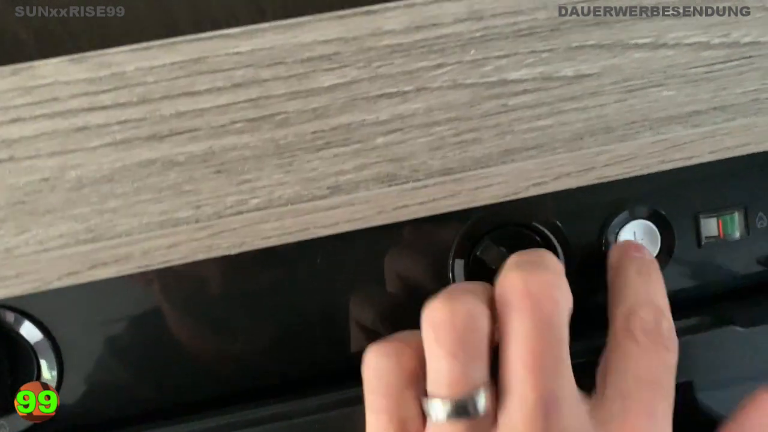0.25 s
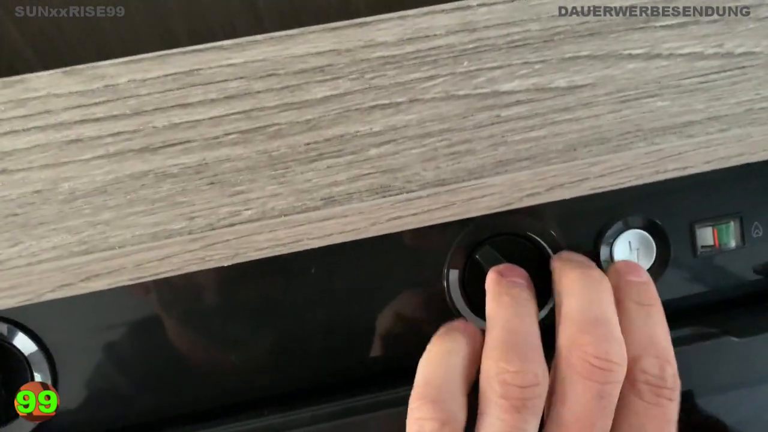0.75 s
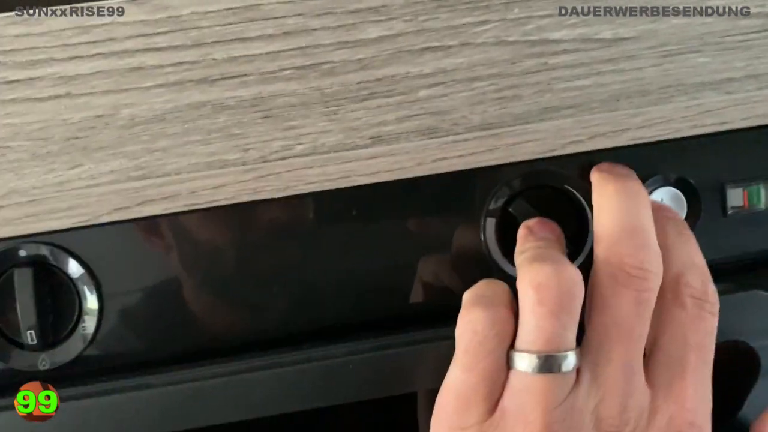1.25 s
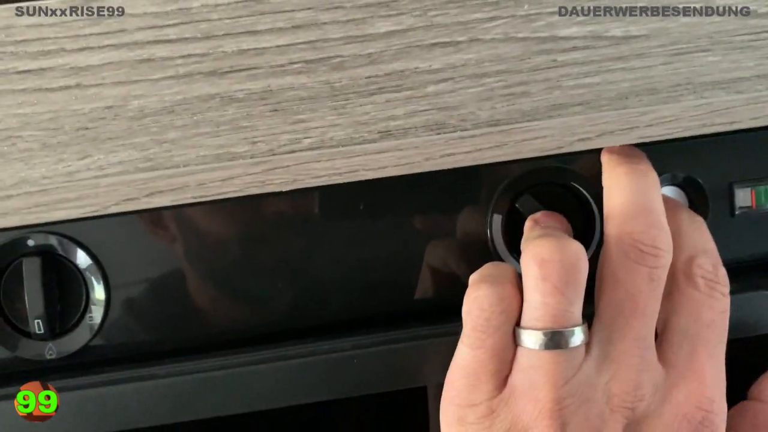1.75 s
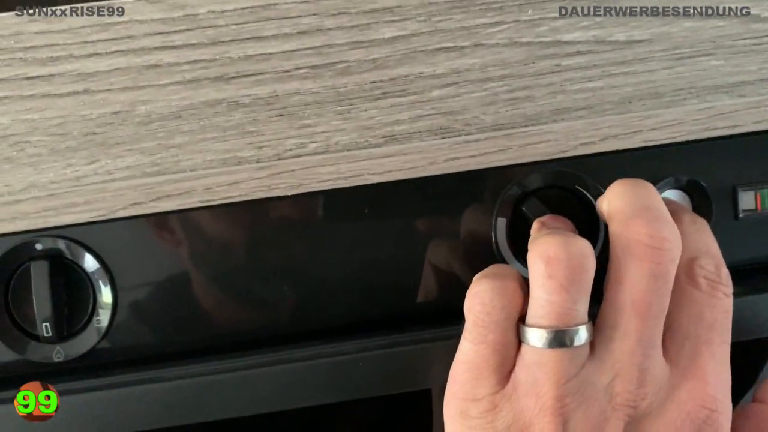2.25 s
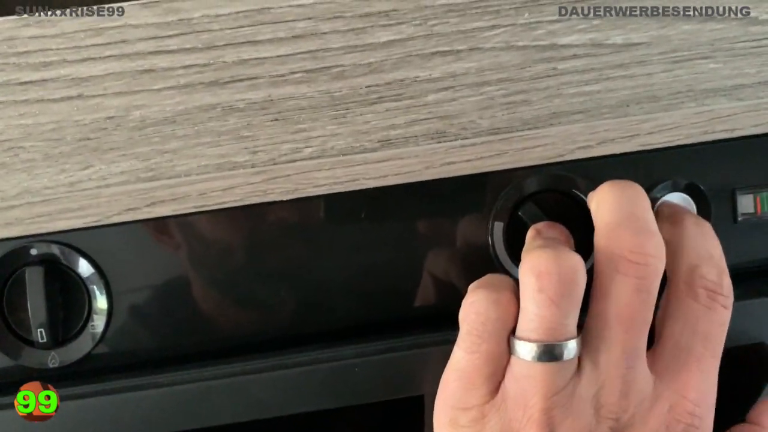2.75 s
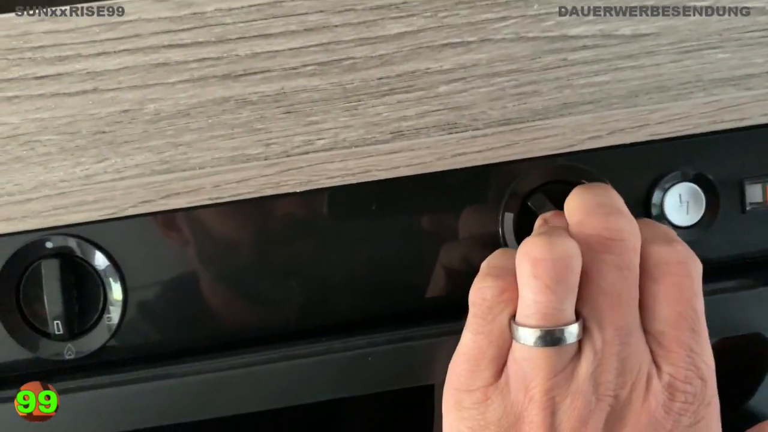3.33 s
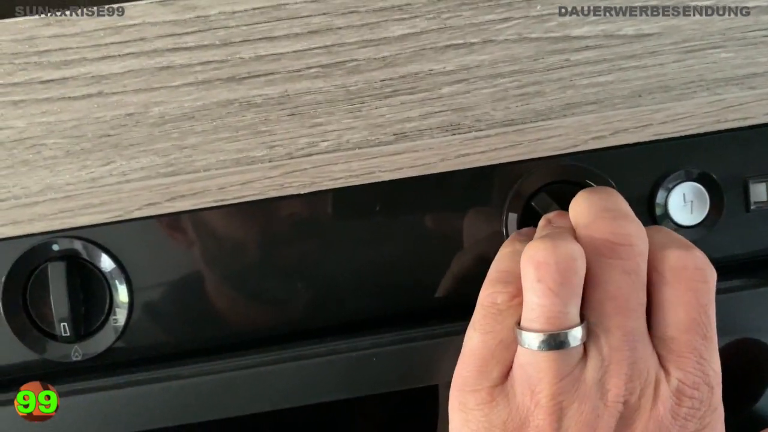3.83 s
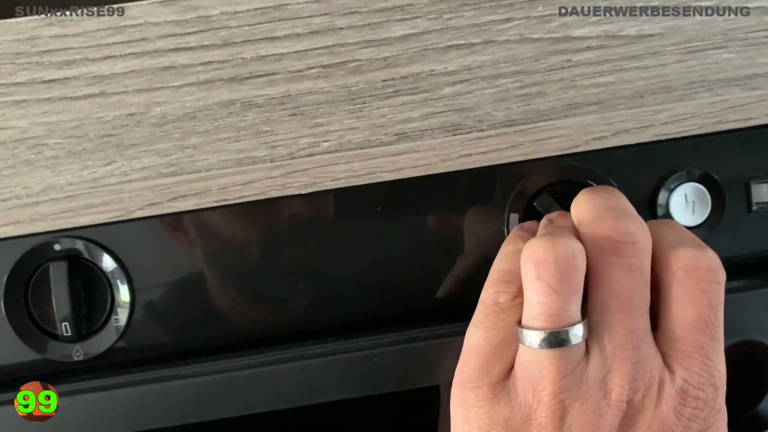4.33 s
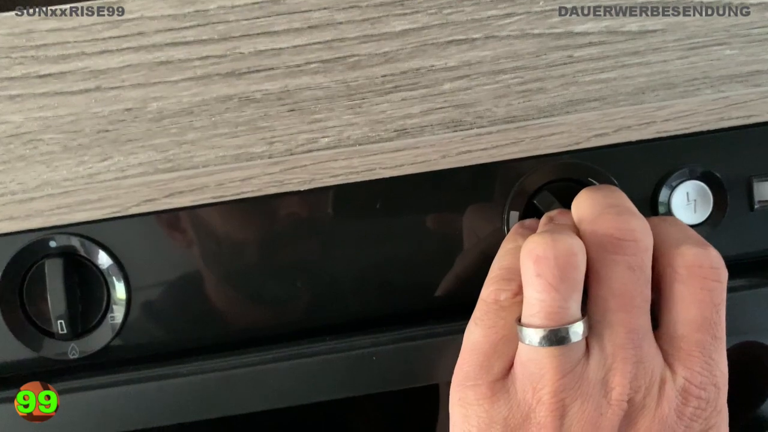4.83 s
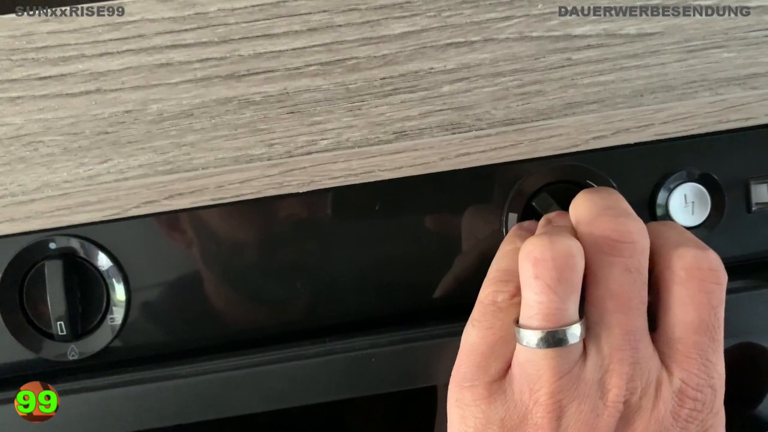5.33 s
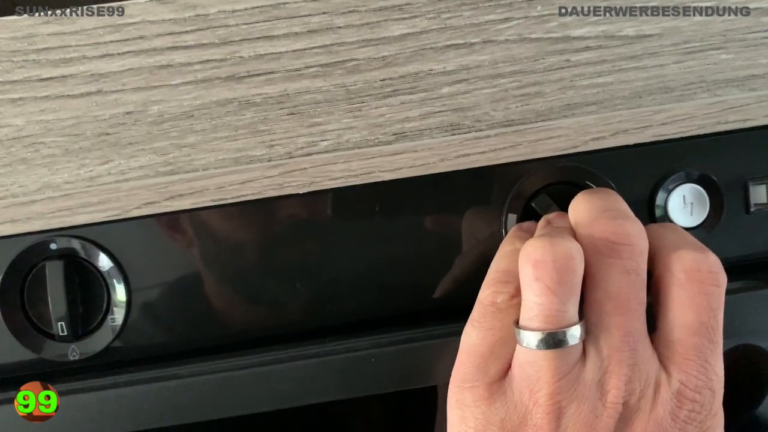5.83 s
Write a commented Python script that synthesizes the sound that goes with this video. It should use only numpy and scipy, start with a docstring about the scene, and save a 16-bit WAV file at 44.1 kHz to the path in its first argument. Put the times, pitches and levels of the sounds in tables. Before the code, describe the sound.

Sharp plastic clicks and low cabinet thuds as a button and knob are worked, with brief finger rubbing over a soft low rumble.

```python
"""Igniter and gas knob of a camper fridge

A hand presses the igniter button and gas knob on the control strip, a phone held close above. Clicks are
decaying plastic modes with bursts of treble noise; thuds are low decaying swings of the cabinet. Fingers rub as
grainy filtered noise; squeaks and short rings sound as wavering tones; low filtered noise rumbles in the small
cabin. Two microphone ports hear these with the left leading; echoes, part of the rubbing and port hiss differ
in each."""
import sys
import numpy as np
from scipy import signal
from scipy.fft import rfft, irfft, next_fast_len
from scipy.io import wavfile
from scipy.ndimage import uniform_filter1d

SR = 44100
rng = np.random.default_rng(int(sys.argv[2]) if len(sys.argv) > 2 else 0)


def to_wav(s):
    """Save 16-bit WAV."""
    ch = np.atleast_2d(s).T  # columns
    pcm = np.round(np.clip(ch, -1, 1) * 32767)  # PCM
    wavfile.write(sys.argv[1], SR, pcm.astype(np.int16))


N = 268039  # length in samples

# Modes of the plastic strip: (frequency [Hz], relative level [dB], t60 [s])
STRIP_MODES = [(1098, 11, 0.025), (1196, -3, 0.061), (1416, -3.5, 0.0287), (1538, 1, 0.021),
               (1764, 7.5, 0.016), (1983, 3, 0.054)]
# Modes of the low knock: (frequency [Hz], relative level [dB], t60 [s])
KNOCK_MODES = [(552, -3, 0.098), (596, -7, 0.19), (754.6, 0.5, 0.055), (861.6, -4, 0.098), (984, 1, 0.027)]
# Modes of the knob: (frequency [Hz], relative level [dB], t60 [s])
KNOB_MODES = [(3071, 2, 0.012), (3430, -10, 0.02)]
# Upper modes, peaks of the treble noise: (frequency [Hz], relative level [dB], t60 [s])
UPPER_MODES = [(4387, 6, 0.11), (4690, -1, 0.032), (6836, 4, 0.018)]
# Spectrum of rubbing and rattle: (frequency [Hz], relative level [dB])
FINGER_COLOUR = [(250, 13.5), (560, -3.5), (900, -3), (1200, -4), (1550, 0), (1900, -10), (2400, -28)]
# Spectrum of treble rubbing and chatter: (frequency [Hz], relative level [dB])
FINGER_TREBLE = [(2000, 0), (3200, -7.5), (4600, -11.5), (5700, -11.5), (7200, -16), (13000, -24.5)]
GRAIN_DB, PATCHY_DB = 4.5, 4  # spread of sample levels, flicker of each third-octave


def undb(db):
    """Logarithmic level: 20 dB is a factor of ten in amplitude."""
    return 10 ** (np.asarray(db) / 20)


def curve(table):
    """Linear interpolation of a (time, level) table, one value per sample."""
    times, levels = np.transpose(table)
    return np.interp(np.arange(N) / SR, times, levels)


def walk(rate):
    """Random modulation: levels drawn at rate [Hz], spread near 1, joined by a moving average."""
    hold = int(SR / rate)
    levels = rng.standard_normal(N // hold + 1)
    return uniform_filter1d(np.repeat(levels, hold), hold)[:N]


def noise(colour, grain_db=0, patchy_db=0, modes=()):
    """Spectral shaping of random pushes to rms 1, with optional grain, band flicker and resonance peaks."""
    resonance_db, resonance_width_hz = 9, 45
    hz, db = np.transpose(colour)
    size = next_fast_len(N)
    f = np.arange(size // 2 + 1) * SR / size + 1  # 1 Hz up, so that the logarithm is finite
    # a few samples much stronger than the rest make tiny clicks
    grain = undb(grain_db * np.minimum(rng.exponential(size=size), 6))
    spectrum = rfft(rng.standard_normal(size) * grain)
    spectrum = spectrum * undb(np.interp(np.log(f), np.log(hz), db, -90, -90))
    peaks = 1
    for mode in modes:
        peaks = peaks + undb(resonance_db) / (1 + (2 * (f - mode[0]) / resonance_width_hz) ** 2)
    spectrum = spectrum * peaks
    if patchy_db:
        x = np.zeros(N)
        # overlapping triangular third-octave bands, each with its own random level
        for k in np.arange(np.floor(3 * np.log2(hz[0])), 3 * np.log2(hz[-1]) + 1):
            weight = np.clip(1 - np.abs(3 * np.log2(f) - k), 0, 1)
            band = irfft(spectrum * weight, size)[:N]
            x = x + undb(patchy_db * walk(90)) * band
    else:
        x = irfft(spectrum, size)[:N]
    return x / x.std()


def add(out, s, sound):
    """Superposition: add a sound from time s [s]."""
    i = int(s * SR)
    out[i:i + len(sound)] += sound[:max(N - i, 0)]


def ring(modes, t, scatter_db, detune, rise_s, favour_hz=0):
    """Modal sum: a blow of finite contact time excites decaying sines a little differently; peak 1."""
    hz, db, t60 = (column[:, None] for column in np.transpose(modes))
    level_scatter, pitch_scatter = rng.standard_normal((2, len(modes), 1))
    if favour_hz:
        db = db - 60 * np.abs(np.log2(hz / favour_hz))  # dB lost per octave from the favoured pitch
    gain = undb(db + scatter_db * level_scatter - 60 * t / t60)
    x = np.sum(gain * np.sin(2 * np.pi * hz * (1 + detune * pitch_scatter) * t), axis=0)
    x = x * (1 - np.exp(-(t / rise_s) ** 2))
    return x / np.abs(x).max()


def ports(x, lead, pan):
    """Interaural-style phase and level: right lags by lead(Hz) radians and is pan(Hz) dB weaker."""
    size = next_fast_len(N + 64)
    hz = np.arange(size // 2 + 1) * SR / size
    both = rfft(x, size)
    left = both * undb(pan(hz) / 2)
    right = both * undb(-pan(hz) / 2) * np.exp(-1j * lead(hz))
    return irfft([left, right], size)[:, :N]


def rumble():
    """Band-limited noise: the cabinet's boom throbs unevenly; the rest of the cabin noise wavers slightly."""
    # Boom over time: (time [s], mean level [dB])
    boom_levels = [(0.0, -33.5), (0.27, -45.5), (1.08, -44.5), (1.47, -25), (1.56, -26.5), (1.78, -38),
                   (3.84, -34.5), (4.15, -31), (4.55, -38), (6.08, -41)]
    # Spectrum of the boom: (frequency [Hz], relative level [dB])
    boom_colour = [(60, -30), (90, -13), (120, -1.5), (145, 1), (175, 1), (200, -4.5), (240, -24.5),
                   (400, -30)]
    # Spectrum of the cabin noise: (frequency [Hz], relative level [dB])
    cabin_colour = [(25, -27), (40, -5.5), (60, 3), (90, 1.5), (200, -18.5), (260, -44), (400, -22.5),
                    (800, -32), (1500, -51)]
    boom = undb(curve(boom_levels) + 1.8 * walk(24)) * noise(boom_colour)
    cabin_db = -41.5
    return boom + undb(cabin_db + 0.95 * walk(11.0)) * noise(cabin_colour)


def strokes():
    """Amplitude envelopes of friction, body and treble: each stroke swells and fades over its length."""
    # Strokes of skin over the strip: (start [s], length [s], peak level [dB], treble relative to it [dB])
    stroke_events = [(-.05, 0.33, -38, -10.5), (0.109, 0.28, -56.5, -4.5), (0.311, 0.5, -49.5, -18),
                     (0.71, 0.26, -51.5, -2.5), (0.958, 0.097, -53, -2.5), (1.24, 0.15, -36.5, -11),
                     (1.327, 0.23, -41, -13.5), (2.676, 0.22, -37, -11.5), (2.871, 0.17, -48.5, -20.5),
                     (3.768, 0.035, -53, -16), (3.574, 0.036, -50, -17), (3.91, 0.12, -48, -33.5),
                     (4.086, 0.24, -63.5, -21), (5.958, 0.15, -38, -12.5)]
    # Fingers resting on the controls: (time [s], level [dB])
    rest_levels = [(0, -63), (1.1, -58.5), (1.65, -50), (1.85, -61), (2.6, -62.5), (3.2, -58), (4.5, -61),
                   (5.0, -70.5), (6.08, -73)]
    t = np.arange(N) / SR
    body = undb(curve(rest_levels))
    treble = body * undb(-19.5)
    for s, length, db, treble_db in stroke_events:
        # a lean under 1 peaks early; the higher power swells the treble more narrowly
        lean, body_power, treble_power = 0.96, 1.77, 1.93
        swell = np.abs(np.sin(np.pi * np.clip((t - s) / length, 0, 1) ** lean))
        body = body + undb(db) * swell ** body_power
        treble = treble + undb(db + treble_db) * swell ** treble_power
    return body, treble


def fingers():
    """Friction: dragging skin makes grainy noise in the plastic's resonances, and rough wavering squeaks and
    short rings."""
    # Squeaks of skin and plastic, and short rings of the strip and knob: (time [s], length [s], mean pitch
    # [Hz], level [dB])
    squeak_and_ring_events = [(0.46, 0.07, 3600, -65), (1.294, 0.012, 1288, -39), (1.302, 0.02, 1254, -31),
                              (1.335, 0.022, 1250, -33), (1.537, 0.038, 1188, -40.5), (1.605, 0.022, 1563, -33.5),
                              (1.675, 0.066, 588, -34.5), (2.737, 0.024, 4380, -51)]
    body, treble = strokes()
    grain = undb(2 * walk(200) + 1.8 * walk(30))
    body_noise = noise(FINGER_COLOUR, GRAIN_DB, PATCHY_DB, STRIP_MODES + KNOCK_MODES)
    treble_noise = noise(FINGER_TREBLE, GRAIN_DB, PATCHY_DB, KNOB_MODES + UPPER_MODES)
    rub = grain * (body * body_noise + treble * treble_noise)
    for s, length, hz, db in squeak_and_ring_events:
        t = np.arange(int(length * SR)) / SR
        waver = 1 + .014 * walk(200)[:len(t)]
        rough = undb(3.5 * walk(200)[:len(t)])
        swell = np.sin(np.pi * (t / length) ** .6) ** .5
        tone = np.sin(2 * np.pi * np.cumsum(hz * waver) / SR)
        add(rub, s, undb(db) * rough * swell * tone)
    # further rubbing, independent at each port
    rub_apart = undb(-4) * body * np.array([noise(FINGER_COLOUR), noise(FINGER_COLOUR)])
    return rub, rub_apart


def clicks():
    """Impact: snaps excite plastic modes, treble crack, chatter and rattle; panels echo them to each port."""
    # Clicks: (time [s], strip level [dB], then relative to the strip: low knock [dB], knob [dB],
    # upper chatter [dB]; pitch that the blow favours [Hz])
    click_events = [(0.0202, -12, -3, -17, -22, 1340), (0.026, -32, 12, -26, -27.5, 1050),
                    (0.0405, -24.5, -21, -30, -30, 1200), (0.0858, -2, -22.5, -21.5, -45, 1440),
                    (0.1272, -13.5, 2, -16, -14, 1780), (0.137, -21, -0.5, -22, -11, 1500),
                    (0.791, -21.5, -8, -33, -39, 1530), (0.819, -25.5, -47, 6, -17.5, 1520),
                    (0.886, -24, -27, -8.5, -13.5, 1490), (1.2275, -40, -10.5, -12, -12.5, 1520),
                    (1.2533, -29, -13, -25, -32.5, 1290), (1.409, -31.5, -17, -47, -18.5, 1420),
                    (1.4333, -25, -16, -41, -23, 1500), (1.4633, -24.5, -17, -29, -14, 1540),
                    (1.6066, -27.5, -4.5, -20, -25, 1550), (1.736, -51.5, 16.5, -9, -2.5, 1090),
                    (2.7302, -16, -8.5, -25, -20.5, 1390), (2.78, -14.5, -4, -14, -25.5, 1400),
                    (2.803, -28.5, 0, -2, -12.5, 1500), (2.8306, -12.5, -52, -15.5, -23, 1520),
                    (3.051, -49, -5, -5, -19, 1560), (3.0967, -32.5, -7, -16, -17.5, 1540),
                    (3.3155, -31, -13, -20, -19.5, 1020), (3.509, -29.5, -2, -23, -24, 1040),
                    (3.8653, -42.5, 5.5, -9, -7, 1620), (4.189, -42, 10.5, -5, -16.5, 1040),
                    (4.2748, -35, 4.5, -24, -9.5, 1610), (4.344, -29.5, -25, -10, -11, 1800),
                    (4.349, -24.5, -44, -18, -33, 1550), (4.36, -38, -35, -9, -30, 1560),
                    (4.447, -37, -10, 0, -3.5, 1970), (4.4595, -32, -9, -11, -26.5, 1600),
                    (4.757, -24, -7, -12, -11.5, 1390), (5.985, -35, -18.5, -26, -12.5, 1590),
                    (6.0051, -16, -17, -32, -17.5, 1430), (6.0593, -13, -29.5, -21, -40.5, 1410)]
    # Thin treble ticks: (time [s], level [dB], t60 [s])
    tick_events = [(0.7906, -25.5, 0.022), (0.812, -36, 0.012), (0.818, -28.5, 0.018), (0.888, -41, 0.008),
                   (1.485, -44, 0.022), (1.569, -36, 0.073), (1.795, -49.5, 0.028), (1.986, -43.5, 0.021),
                   (2.313, -47, 0.034), (2.506, -47.5, 0.025)]
    crack_db = -7.5  # relative to the upper chatter
    rattle_db, rattle_per_db = -20.5, 0.46  # after a 0 dB click; growth per dB of click
    settle_s, settled_db = .0045, -8
    echo_db, echo_t60_s = -11, .035
    t = np.arange(int(.15 * SR)) / SR
    snaps, crack, rattle, chatter = np.zeros((4, N))  # the last three are envelopes of noise
    # the part lands again and damps the strip's ring
    damped = undb(settled_db * (1 - np.exp(-(t / settle_s) ** 4)))
    # each decay of the noise has a fast part and a weaker slow tail
    crack_decay = undb(-60 * t / 0.0071) + undb(-24.0 - 60 * t / 0.038)
    chatter_decay = undb(-60 * t / 0.022) + undb(-9.5 - 60 * t / 0.12)
    chatter_decay = chatter_decay * np.minimum(t / 0.0012, 1)
    for s, db, knock_db, knob_db, upper_db, hz in click_events:
        snap = damped * ring(STRIP_MODES, t, 2, .015, .001, hz)
        snap = snap + undb(knock_db) * ring(KNOCK_MODES, t, 3.5, .02, .001)
        snap = snap + undb(knob_db) * ring(KNOB_MODES, t, 4, .02, .001)
        add(snaps, s, undb(db) * snap)
        add(crack, s, undb(db + upper_db + crack_db) * crack_decay)
        rattle_decay = undb(rattle_db + rattle_per_db * db - 60 * t / 0.084)
        add(rattle, s, rattle_decay * np.minimum(t / 0.005, 1) ** 2)
        add(chatter, s, undb(db + upper_db) * chatter_decay)
    for s, db, t60 in tick_events:
        add(crack, s, undb(db - 60 * t / t60) * np.minimum(t / 0.00046, 1))
    rattle = rattle * undb(2 * walk(200))
    chatter = chatter * undb(2 * walk(250))
    crack_noise = noise([(2000, -6.5), (3200, -10.0), (8500, -10), (10500, -4.5),
                         (11700, -10.5), (13400, 3.5), (14500, -7.5), (16000, -7.5)])
    rattle_noise = noise(FINGER_COLOUR, GRAIN_DB, PATCHY_DB, STRIP_MODES + KNOCK_MODES)
    chatter_noise = noise(FINGER_TREBLE, GRAIN_DB, PATCHY_DB, KNOB_MODES + UPPER_MODES)
    direct = snaps + crack * crack_noise + rattle * rattle_noise + chatter * chatter_noise
    # decaying random reflections from 3 ms on, different at each port
    echo = rng.standard_normal((2, len(t))) * undb(-60 * t / echo_t60_s) * (t > .003)
    echo = undb(echo_db) * echo / np.linalg.norm(echo, axis=1, keepdims=True)
    return direct, signal.fftconvolve(direct[None], echo, axes=1)[:, :N]


def thuds():
    """Damped oscillation: the cabinet swings up over a cycle or two and rings out, a lower panel with it."""
    # Thuds: (time [s], level before the high-pass [dB], pitch [Hz])
    thud_events = [(0.027, -2.5, 150), (0.061, -10.5, 178), (0.094, -10, 179.1), (0.134, -8.5, 174.8),
                   (0.167, -11.5, 143.2), (0.538, -22.5, 116.6), (0.646, -18, 137.3), (0.799, -16, 173.4),
                   (1.001, -14.5, 85.8), (1.388, -16, 114.4), (1.419, -10.5, 162.5), (1.433, -8, 130.4),
                   (1.471, -9, 115), (1.585, -13, 115.8), (1.74, -15.5, 114), (1.943, -25.5, 169.7),
                   (2.7447, -11, 154.8), (2.783, -12.5, 177.8), (2.895, -22, 165.2), (3.102, -18, 145.4),
                   (3.323, -25.5, 163), (3.517, -19, 171.5), (3.883, -16.5, 175.5), (4.204, -19, 182.3),
                   (4.285, -20, 186.2), (4.456, -20.5, 178.5), (4.765, -17, 177.5), (5.99, -20.5, 184.6),
                   (6.008, -11.5, 138)]
    out = np.zeros(N)
    t = np.arange(int(.3 * SR)) / SR
    for s, db, hz in thud_events:
        swing = np.sin(2 * np.pi * hz * t)
        swing = swing + undb(-5.5) * np.sin(2 * np.pi * 0.79 * hz * t)  # lower panel
        swing = swing + undb(-23) * np.sin(2 * np.pi * 2.1 * hz * t)
        swing = swing * (1 - np.exp(-(t / 0.0051) ** 2)) * undb(-60 * t / 0.17)
        add(out, s - .002, undb(db) * swing / np.abs(swing).max())  # starts 2 ms before the listed time
    return signal.sosfilt(signal.butter(2, 70, "high", fs=SR, output="sos"), out)


def scene():
    """Superposition at two ports: shared sound leads at the left; echoes, some rubbing and hiss differ."""
    # Sounds at the hand: (frequency [Hz], left lead [rad], left minus right [dB])
    hand_lead = [(0, 0.069, -1), (244.1, 0.22, -0.5), (617, 1.4, 2.5), (1340, 1.58, -1.5),
                 (7280, 1.5, -0.5)]
    # Spectrum of the hiss shared by the ports: (frequency [Hz], relative level [dB])
    hiss_colour = [(300, 0.5), (1500, -13), (3000, -34.5), (7500, 5), (13500, 2), (16000, -0.5)]
    # Spectrum of the noise of each port: (frequency [Hz], relative level [dB])
    port_colour = [(25, 15), (200, 7), (700, -16.5), (2000, -14), (6000, -20), (8000, -30.5),
                   (16000, -46.5)]
    port_lag_s, hiss_db, port_db = 0.000214, -64, -52.5
    lead_hz, lead_rad, pan_db = np.transpose(hand_lead)

    def lag(f):
        """Constant delay: phase grows in proportion to frequency."""
        return 2 * np.pi * f * port_lag_s

    def near_lead(f):
        """Near-field phase from the table; above its last point the constant delay holds."""
        return np.where(f < lead_hz[-1], np.interp(f, lead_hz, lead_rad), lag(f))

    def near_pan(f):
        """Near-field level difference from the table; none above its last point."""
        return np.interp(f, lead_hz, pan_db, 0, 0)

    rub, rub_apart = fingers()
    snaps, echoes = clicks()
    hand = ports(snaps + thuds() + rub, near_lead, near_pan)
    cabin = ports(rumble() + undb(hiss_db) * noise(hiss_colour), lag, np.zeros_like)
    port_noise = undb(port_db) * np.array([noise(port_colour), noise(port_colour)])
    return hand + cabin + echoes + rub_apart + port_noise


def record(dry):
    """Low-pass filtering: the phone cuts the top above 15.9 kHz."""
    return signal.sosfilt(signal.ellip(10, .2, 80, 15900, fs=SR, output="sos"), dry)


dry = scene()
out = record(dry)
to_wav(out)
```